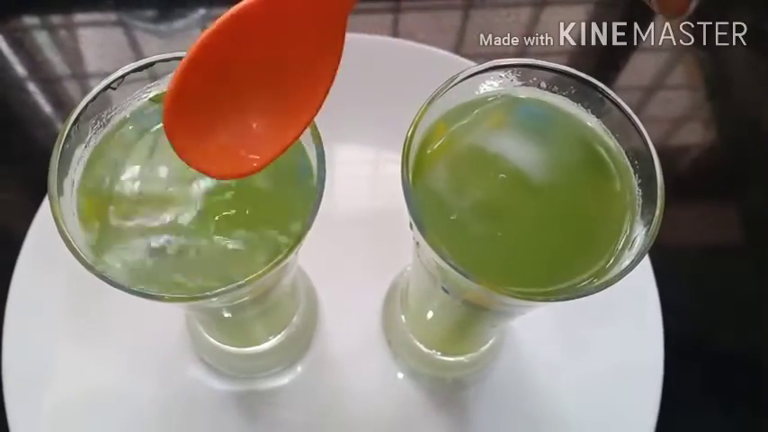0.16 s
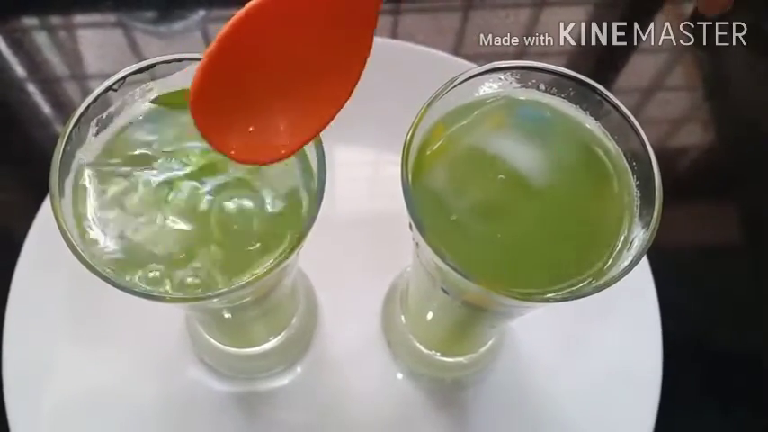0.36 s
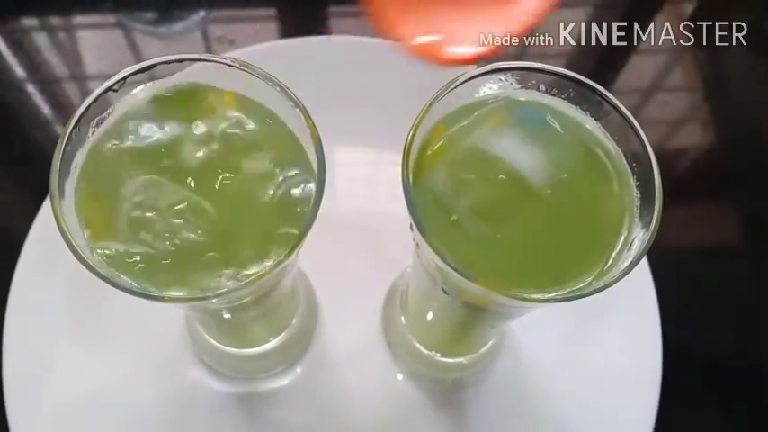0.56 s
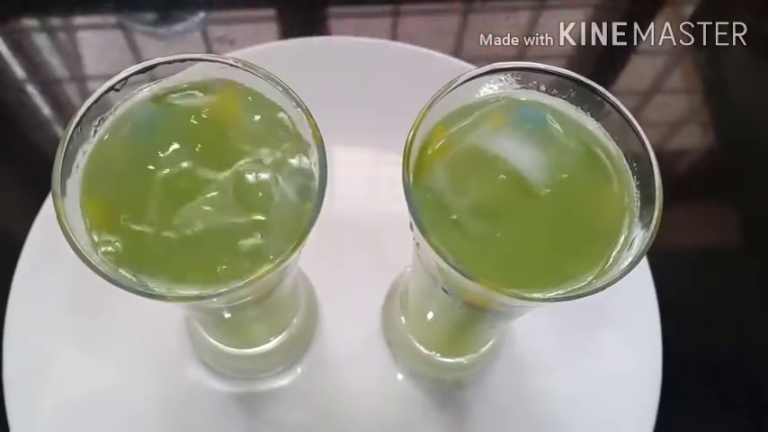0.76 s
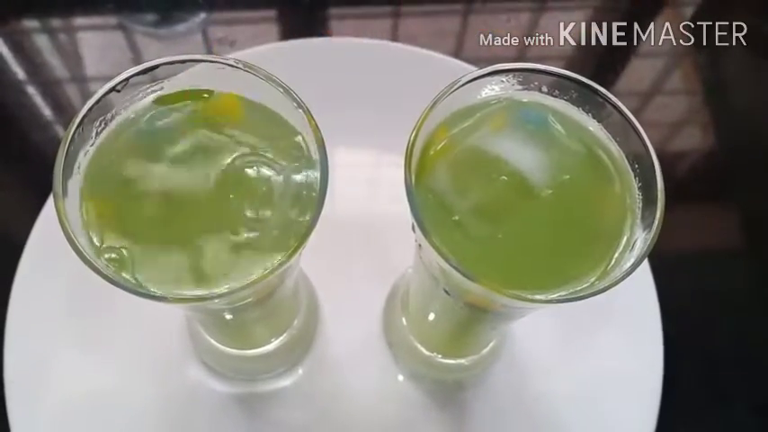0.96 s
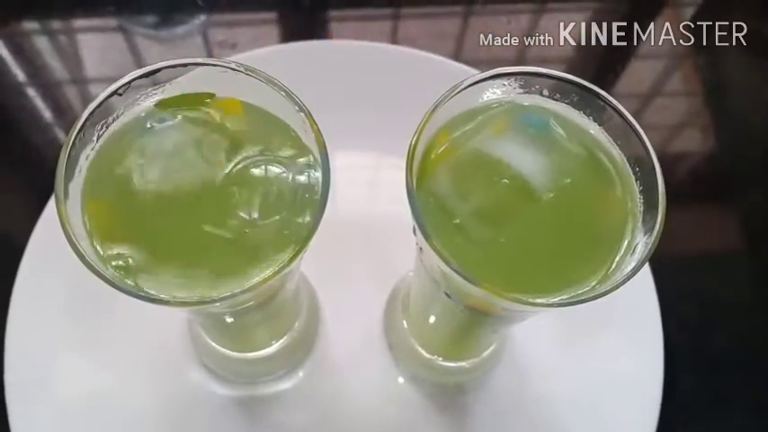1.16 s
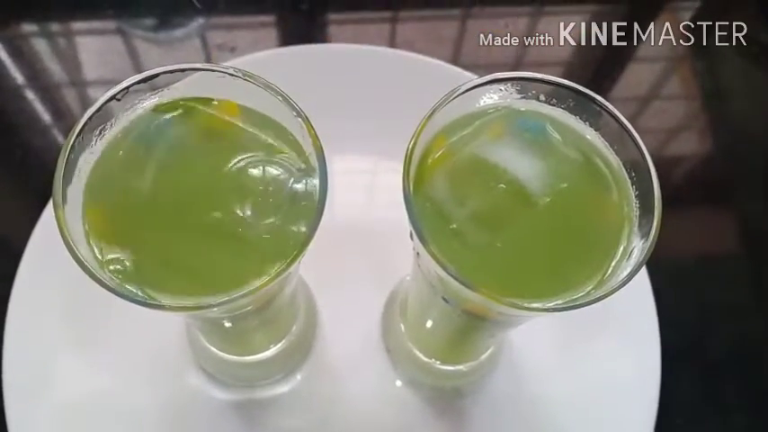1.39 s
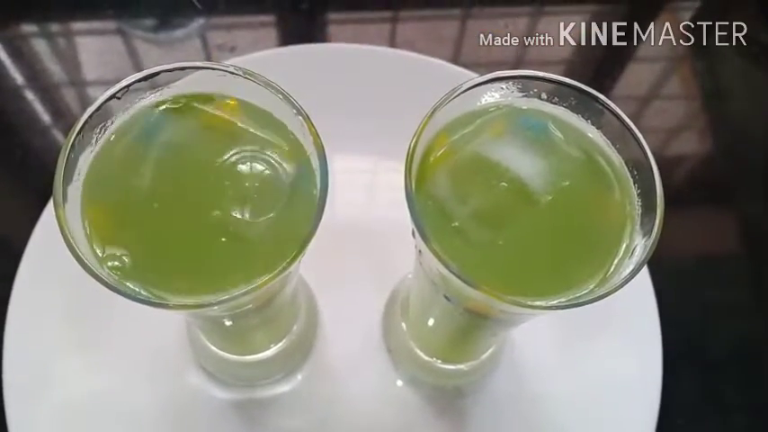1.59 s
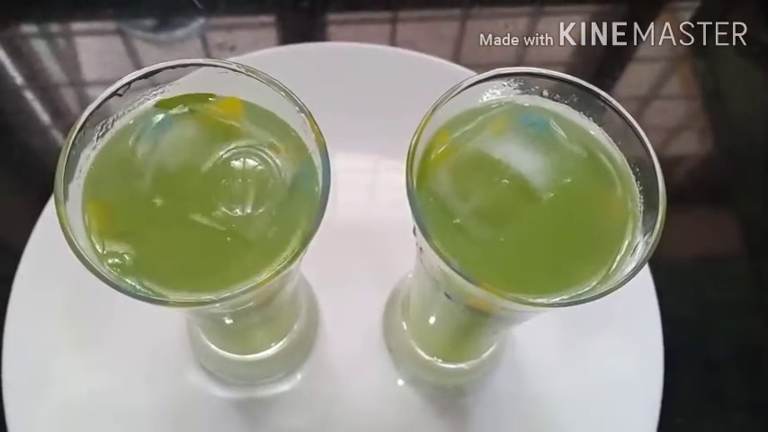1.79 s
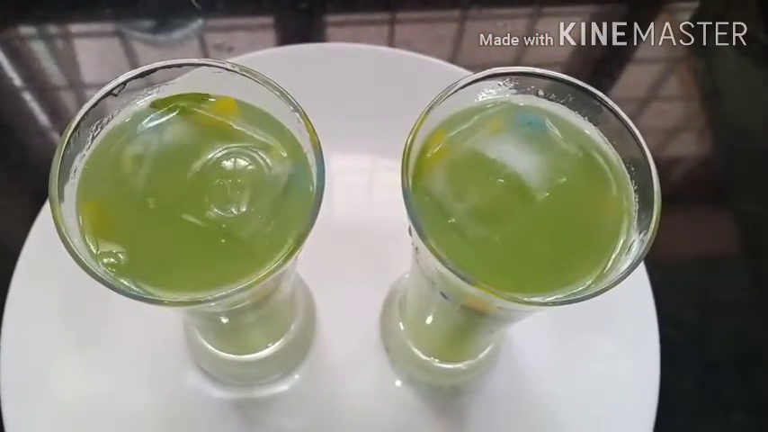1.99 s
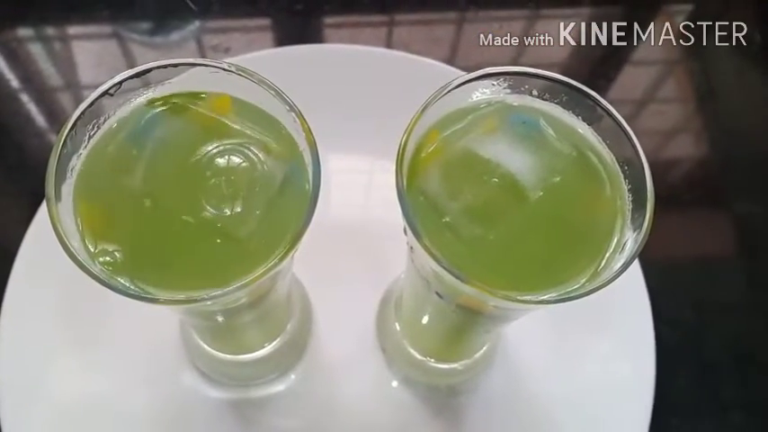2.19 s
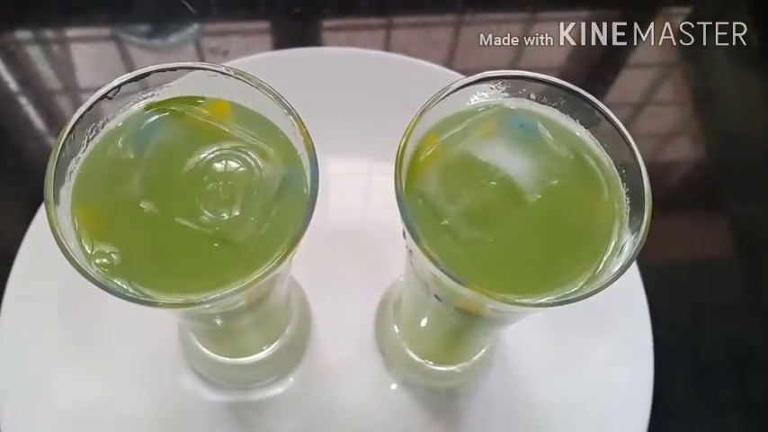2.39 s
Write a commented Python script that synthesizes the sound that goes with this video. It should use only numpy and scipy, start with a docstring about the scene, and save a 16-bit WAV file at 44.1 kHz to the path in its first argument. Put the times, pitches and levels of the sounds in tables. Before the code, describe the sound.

Ice drops into a glass of juice, clinking and bubbling, before a spoon scrapes among more cubes nearby

```python
"""A soft rustle comes first, like ice gliding round a bowl: coloured noise over a quiet, low hush.
An ice cube slides off a spoon into a tall glass of juice in a small kitchen. It clinks on the wall:
noise clacks plus decaying modes that sag as the juice climbs. Bubbles plop as gliding sines in a
spray of tiny ringing drops. Then the spoon digs for the next cube: noise clacks and a crackling
scrape in a bowl close by, whose modes ring along. Decaying-noise echoes make the room."""
import sys
import numpy as np
from scipy import signal
from scipy.fft import irfft
from scipy.io import wavfile

SR = 44100
rng = np.random.default_rng(int(sys.argv[2]) if len(sys.argv) > 2 else 0)


def bounce(signal):
    """Save signal as a 16-bit WAV file at the path given by the first command-line argument."""
    frames = np.transpose(np.atleast_2d(signal))
    limited = np.clip(frames, -1, 1)
    pcm = np.round(limited * 32767).astype(np.int16)
    wavfile.write(sys.argv[1], SR, pcm)


N = 108045
T = np.arange(N) / SR


def from_db(db):
    """Decibels to gain."""
    return 10 ** (np.asarray(db) / 20)


def rms_one(x):
    """Scale to unit rms."""
    return x / np.sqrt(np.mean(x ** 2) + 1e-20)


def in_time(rows):
    """A control curve at every sample, held at its end values outside its span."""
    return np.interp(T, *np.transpose(rows))


def at_hz(points, hz):
    """Read a table on a log-frequency axis."""
    table_hz, values = np.transpose(points)
    return np.interp(np.log(hz + 1e-9), np.log(table_hz), values)


def fade(t, t60):
    """Exponential decay that falls 60 dB in t60 seconds."""
    return np.exp(-np.log(1000) * t / t60)


def passage(rows):
    """Gain of a level curve, silent outside its span."""
    return from_db(in_time(rows)) * (T >= rows[0][0]) * (T <= rows[-1][0])


def pan(db):
    """Left and right gains for a level difference, at constant power."""
    gains = from_db(np.array([[.5], [-.5]]) * db)
    return gains / np.sqrt(np.mean(gains ** 2, axis=0))


def add(out, s, x):
    """Mix a sound in at a time in seconds."""
    i = max(int(s * SR), 0)
    out[:, i:i + x.shape[-1]] += x[..., :N - i]


# how alike the two sides of a noise are: (frequency [Hz], left-right correlation)
SIDE_LIKENESS = [(650, 0.57), (1400, 0)]


def noise(colour, size, sides=None, levels=None):
    """Stereo noise of a given colour, rms about 1 before panning and band levels."""
    hz = np.arange(size // 2 + 1) * SR / size
    # a phase gap between the sides sets their correlation in each bin
    apart = np.arccos(np.clip(at_hz(SIDE_LIKENESS, hz), -1, 1)) * rng.choice([-.5, .5], len(hz))
    phase = rng.uniform(0, 2 * np.pi, len(hz)) + np.array([apart, -apart])
    spectrum = np.exp(1j * phase) * rms_one(from_db(at_hz(colour, hz))) * np.sqrt(size)
    if sides is not None:
        spectrum = spectrum * pan(at_hz(sides, hz))
    if levels is not None:
        spectrum = spectrum * from_db(at_hz(levels, hz))
    return irfft(spectrum, size)


ATTACK_S = 0.00061


def snap(burst, t60):
    """Give a burst of noise a quick attack and a decay."""
    t = T[:burst.shape[1]]
    return burst * fade(t, t60) * (1 - np.exp(-(t / ATTACK_S) ** 2))


def ring(clicks, hz, t60):
    """A struck mode whose pitch may move; it reaches the two sides a quarter cycle apart."""
    turn = np.exp(2j * np.pi * np.cumsum(hz + 0 * T) / SR)
    # the tiny offset keeps the decay clear of denormal numbers
    mode = turn * signal.lfilter([1], [1, -fade(1 / SR, t60)], clicks + 1e-18)
    # a pole at the mean pitch softens the onset
    mode = signal.lfilter([.2], [1, -.8 * np.exp(2j * np.pi * np.mean(hz) / SR)], mode)
    return np.array([mode.real, mode.imag])


def strikes(rows):
    """One click for each (time [s], level [dB]) row."""
    out = np.zeros(N)
    for s, db in rows:
        out[int(s * SR)] += from_db(db)
    return out


GRAIN_SPREAD_DB = 5.5  # exponential scale of the click sizes, capped at twice this


def patter(per_s):
    """Random clicks of uneven size and either sign, rms 1."""
    size_db = GRAIN_SPREAD_DB * np.minimum(rng.exponential(1, N), 2)
    sizes = from_db(size_db) * rng.choice([-1, 1], N)
    return rms_one(sizes * (rng.random(N) < per_s / SR))


CLACK_T60_S = 0.023  # shared by the bowl's clacks and every crackle tick


def crackle(colour, sides, per_s):
    """Tiny ticks of a given colour scattered at random, rms 1."""
    tick = snap(noise(colour, size=512, sides=sides), CLACK_T60_S)
    return rms_one(signal.fftconvolve(patter(per_s)[None], tick)[:, :N])


# energy of each echo set before the low-pass
NEAR_T60_S, NEAR_DB, ROOM_T60_S, ROOM_DB = 0.11, -5.5, 0.59, -8
WALL_CUT_HZ = 8400


def kitchen(x):
    """Quick reflections from the table and a longer tail from the walls, dulled by one low-pass."""
    t, response = T[:SR], 0
    for t60, db, build_s in ((NEAR_T60_S, NEAR_DB, .003), (ROOM_T60_S, ROOM_DB, .012)):
        build_up = 1 - np.exp(-(t / build_s) ** 2)
        echoes = rng.standard_normal((2, SR)) * fade(t, t60) * build_up
        response = response + from_db(db) * rms_one(echoes) / np.sqrt(SR)
    response = signal.lfilter(*signal.butter(1, min(WALL_CUT_HZ, .45 * SR), fs=SR), response)
    return signal.fftconvolve(x, response, axes=1)[:, :N]


# tone of the background hush: (frequency [Hz], level [dB])
HUSH_COLOUR = [(25, -33.5), (110, -1), (240, -2), (400, -7.5), (1500, -10), (5000, -17.5), (6700, -15.5),
               (9000, -36)]
HUSH_DB = -65


def hush():
    """Steady noise, weighted to the lows, under everything."""
    return from_db(HUSH_DB) * noise(HUSH_COLOUR, size=N)


# loudness of the rustle, held at its last level to the end: (time [s], level [dB])
GLIDE_LEVEL = [(0, -47.5), (.3, -48), (.5, -49.5), (.79, -50), (1, -61), (1.25, -67.5)]
# tone of the rustle: (frequency [Hz], level [dB])
GLIDE_COLOUR = [(500, -23.5), (950, -13), (1350, 3), (1750, 6.5), (2250, 2), (2700, -11.5), (3850, -9.5),
                (4700, -31.5), (6500, -13.5), (8500, -44)]
# placing of the bowl, shared by rustle and clacks: (frequency [Hz], left minus right [dB])
BOWL_PAN = [(5000, 4.5), (6700, -1.5), (8500, 11.5)]


def glide():
    """A soft rustle, like ice gliding round the bowl: coloured noise on a level curve."""
    return from_db(in_time(GLIDE_LEVEL)) * noise(GLIDE_COLOUR, size=N, sides=BOWL_PAN)


# spoon and cubes knock in the bowl: (time [s], low level [dB], middle level [dB], high level [dB])
BOWL_CLACKS = [(1.2886, -15.5, -30.5, -38), (1.2975, -25, -28.5, -22), (1.3727, -10.5, -25.5, -11),
               (1.385, -27, -33, -26), (1.402, -26, -34.5, -22), (1.4414, -26, -33, -23),
               (1.5162, -27.5, -34, -36), (1.545, -16, -26, -49), (1.552, -17, -40, -27),
               (1.561, -17, -29, -18.5), (1.6176, -29, -36.5, -27), (1.8921, -76, -35.5, -59),
               (1.9997, -72, -21, -17.5), (2.0138, -24, -30, -20.5), (2.0451, -31, -27.5, -14.5),
               (2.1452, -61, -14.5, -17), (2.1595, -28.5, -25.5, -17.5)]
# where those three levels apply: one (frequency [Hz]) each
CLACK_BANDS_HZ = [1000, 3200, 8000]
# tone of clacks and scrape: (frequency [Hz], level [dB])
CLACK_COLOUR = [(200, -48), (700, -14.5), (1450, -1.5), (1800, -4.5), (2500, 7.5), (4900, -3.5),
                (5700, -11), (6800, -10), (9500, -31.5), (15000, -39)]
# the spoon scrapes among the cubes: (time [s], level [dB])
SCRAPE_LEVEL = [(1.3, -47), (1.42, -48), (1.5, -56.5), (1.58, -49), (1.68, -58), (1.86, -65), (2, -42),
                (2.17, -53.5)]
# the bowl itself is struck, as drive to its modes: (time [s], level [dB])
BOWL_TAPS = [(1.3735, -60), (1.545, -43), (1.71, -51.5), (1.9702, -40.5), (2.0145, -36.5), (2.1463, -44)]
# ringing modes of the bowl: (frequency [Hz], gain [dB], decay t60 [s])
BOWL_MODES = [(1439, -9.5, 0.35), (2829, 4.5, 0.2), (4600, 1.5, 0.042), (5340, -21, 0.074)]
GRAINS_PER_S = 280  # also the grain of the cube rubbing the glass
SCRAPE_RING_DB = -38.5  # how hard the scrape drives the modes, on top of its level curve


def bowl():
    """Dry clacks of ice and a grainy scrape; taps and the scrape set the bowl's modes ringing."""
    out = passage(SCRAPE_LEVEL) * crackle(CLACK_COLOUR, BOWL_PAN, GRAINS_PER_S)
    for s, *levels_db in BOWL_CLACKS:
        bands = list(zip(CLACK_BANDS_HZ, levels_db))
        burst = noise(CLACK_COLOUR, size=1024, sides=BOWL_PAN, levels=bands)
        add(out, s, snap(burst, CLACK_T60_S))
    for hz, db, t60 in BOWL_MODES:
        scrape = from_db(SCRAPE_RING_DB) * passage(SCRAPE_LEVEL) * patter(GRAINS_PER_S)
        drive = strikes(BOWL_TAPS) + scrape
        out += from_db(db) * pan(at_hz(BOWL_PAN, hz)) * ring(drive, hz, t60)
    return out


# tiny drops and bubbles as the cube breaks the surface: (time [s], level [dB])
SPLASH_LEVEL = [(.095, -56), (.145, -42.5), (.27, -43.5), (.4, -70.5)]
# tone of the spray, and of the clacks on the glass: (frequency [Hz], level [dB])
CLINK_COLOUR = [(70, -35), (240, -18), (950, -19), (1400, -10), (2300, 4.5), (5500, -5.5), (6900, -5.5),
                (8200, -24.5), (15000, -34)]
# placing of the glass and its spray: (frequency [Hz], left minus right [dB])
GLASS_PAN = [(2500, -1.5), (6700, -5), (9000, 5)]
DROPS_PER_S, DROP_HZ = 1400, (1500, 3965)  # rate, lowest and highest pitch
DROP_CYCLES = 23  # cycles to fall 60 dB
SPRAY_DB = -1.5  # relative to the ringing drops


def splash(count=20):
    """Tiny bubbles, each ringing briefly at one of a set of pitches, in a bright spray."""
    clicks, dealt = patter(DROPS_PER_S), rng.integers(0, count, N)
    rings = 0
    for k, hz in enumerate(np.geomspace(*DROP_HZ, count)):
        drops = ring(clicks * (dealt == k), hz, DROP_CYCLES / hz)
        rings = rings + drops[::(-1) ** k]  # every other pitch swaps sides
    spray = from_db(SPRAY_DB) * crackle(CLINK_COLOUR, GLASS_PAN, DROPS_PER_S)
    return passage(SPLASH_LEVEL) * (rms_one(rings) + spray)


# bubbles, each glide going on for a second length as it dies away:
# (time [s], length [s], first pitch [Hz], pitch after one length [Hz], level [dB], left minus right [dB])
BUBBLE_PLOPS = [(0.101, 0.042, 1994, 2153, -33, -5), (0.2756, 0.005, 2170, 2120, -18.5, -6),
                (0.273, 0.025, 222, 330, -49.5, -3), (0.2813, 0.0054, 2370, 2270, -19, 9),
                (0.296, 0.022, 2333, 3374, -26, 3), (0.434, 0.019, 846.6, 1070, -37, -2),
                (0.442, 0.033, 228, 305, -52.5, 2), (0.462, 0.023, 1500, 2420, -32, -1),
                (0.478, 0.04, 2230, 2443, -31, 7.5)]
PLOP_RISE = 0.34  # share of the length at which the swell peaks


def juice():
    """Bubbles swell and glide, mostly up as they near the surface; the lowest are soft gulps."""
    out = np.zeros((2, N))
    for s, length, first_hz, last_hz, db, side_db in BUBBLE_PLOPS:
        u = T[:int(2 * length * SR)] / length
        phase = 2 * np.pi * np.cumsum(first_hz * (last_hz / first_hz) ** u) / SR
        swell = (u / PLOP_RISE * np.exp(1 - u / PLOP_RISE)) ** 2
        tone = np.array([np.sin(phase), np.sin(phase + np.pi / 3)])
        add(out, s, from_db(db) * pan(side_db) * swell * tone)
    return out


# the cube meets the glass: (time [s], ring drive level [dB], clack level [dB])
GLASS_CLINKS = [(.128, -39, -36.5), (.1415, -46, -29), (.1515, -47.5, -23), (.167, -48, -24),
                (.1818, -32.5, -18.5), (0.2178, -65, -24.5), (.239, -56, -30), (.252, -32.5, -22),
                (.278, -62, -32), (.4188, -39.5, -39), (.462, -38.5, -34.5), (.747, -46, -53),
                (.853, -48, -54)]
# ringing modes of the glass: (frequency [Hz], gain [dB], decay t60 [s], pitch sag at full height [share])
GLASS_MODES = [(1511, -2.5, 0.19, .07), (2582, 4, 0.29, 0.15), (4706, -6, 0.17, 0.011),
               (6920, -6, 0.18, 0.034), (9300, -15, 0.13, 0.033), (13200, -25, .12, .01)]
# height of the juice as the cube sinks and bobs: (time [s], height [share of the highest])
JUICE_HEIGHT = [(.19, 0.018), (.228, 0.35), (.268, 0.99), (.3, .82), (.55, .68)]
CLINK_T60_S = 0.039
SOFT_DULLING = 0.56  # dB lost per octave for each dB that a touch is weaker
RUB_FROM_S, RUB_TO_S = 0.2, 0.21  # the cube rubs the wall as it sinks
RUB_DB = -53.5  # before the halving and the tilt below


def glass():
    """Each touch of the cube is a short clack and a ring that the rising juice pulls down."""
    out, height = np.zeros((2, N)), in_time(JUICE_HEIGHT)
    for s, _, db in GLASS_CLINKS:
        clack = snap(noise(CLINK_COLOUR, size=2048, sides=GLASS_PAN), CLINK_T60_S)
        add(out, s, from_db(db) * clack)
    rub_gain = passage([(RUB_FROM_S, RUB_DB), (RUB_TO_S, RUB_DB)])
    rub = np.abs(patter(GRAINS_PER_S)) * rub_gain / 2
    hardest = max(db for _, db, _ in GLASS_CLINKS)
    lowest_hz = GLASS_MODES[0][0]
    for hz, level_db, t60, sag in GLASS_MODES:
        dulling = SOFT_DULLING * np.log2(hz / lowest_hz)
        touches = strikes([(s, db - dulling * (hardest - db)) for s, db, _ in GLASS_CLINKS])
        drive = touches + rub * lowest_hz / hz  # the rub drives high modes less
        ringing = ring(drive, hz * (1 - sag * height), t60)
        out += from_db(level_db) * pan(at_hz(GLASS_PAN, hz)) * ringing
    return out


def scene():
    """Glass, juice and bowl in the room, over the rustle and the hush, which stay dry."""
    near = glass() + juice() + splash() + bowl()
    return near + kitchen(near) + glide() + hush()


CUTOFF_HZ = 15700


def record(dry):
    """The top is cut steeply by an elliptic low-pass."""
    return signal.sosfilt(signal.ellip(10, .2, 80, CUTOFF_HZ, fs=SR, output="sos"), dry)


dry = scene()
out = record(dry)
bounce(out)
```